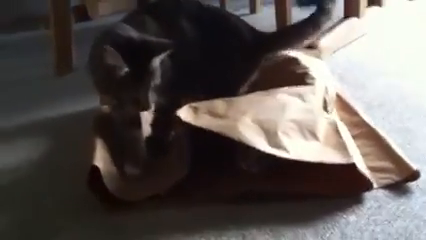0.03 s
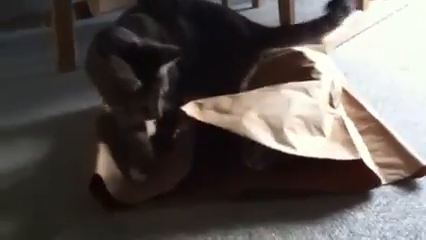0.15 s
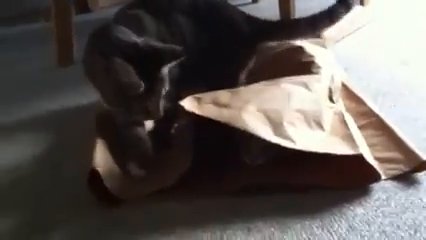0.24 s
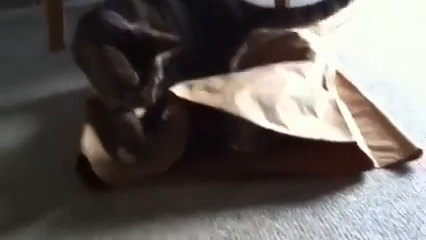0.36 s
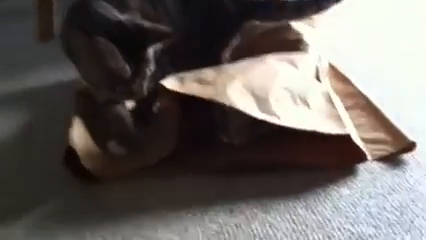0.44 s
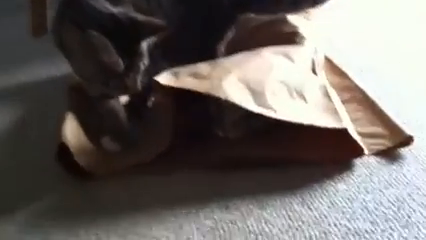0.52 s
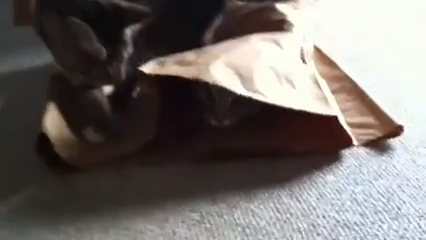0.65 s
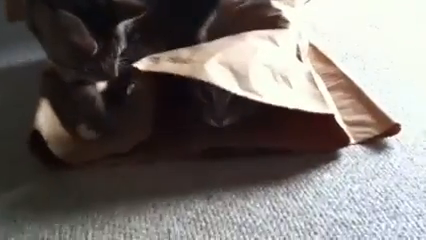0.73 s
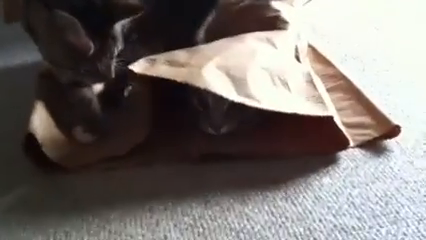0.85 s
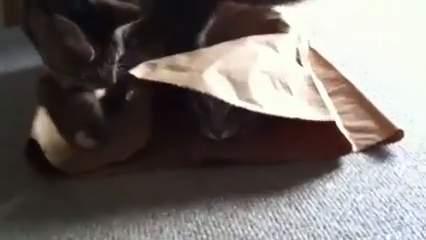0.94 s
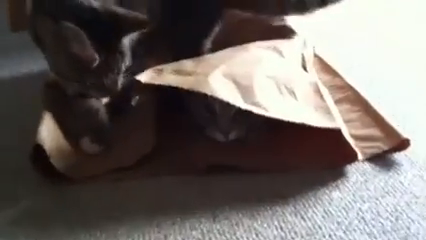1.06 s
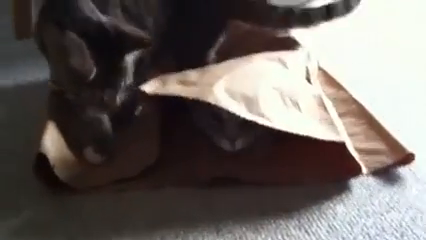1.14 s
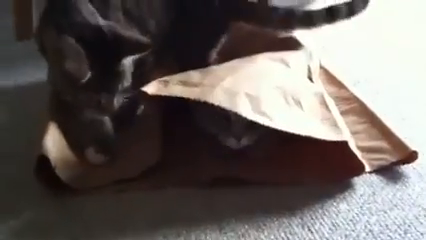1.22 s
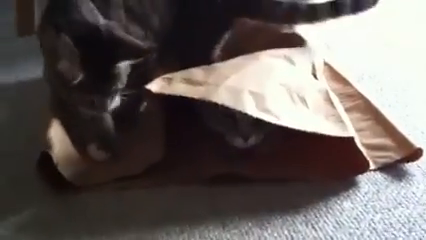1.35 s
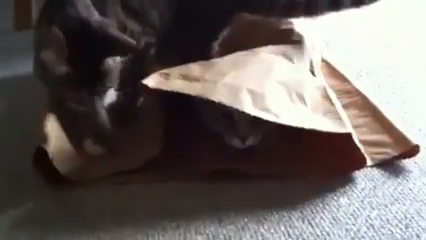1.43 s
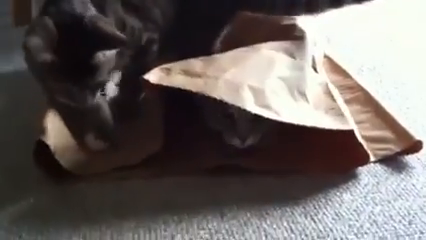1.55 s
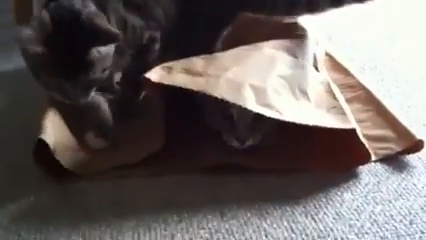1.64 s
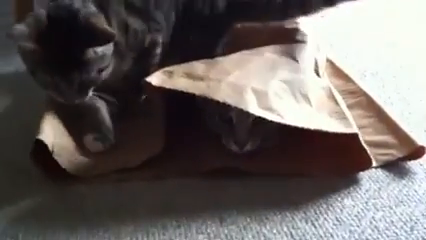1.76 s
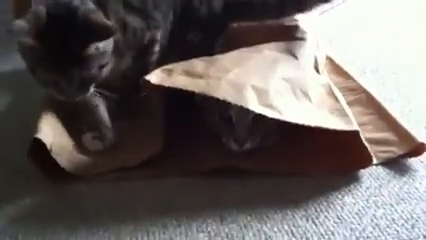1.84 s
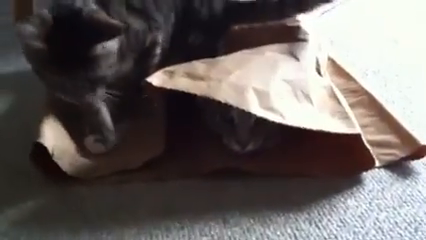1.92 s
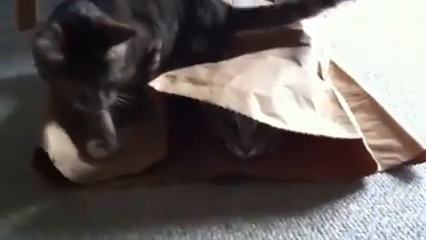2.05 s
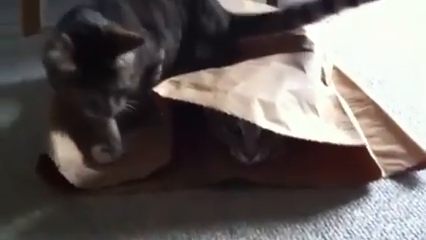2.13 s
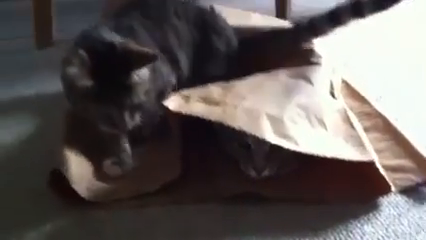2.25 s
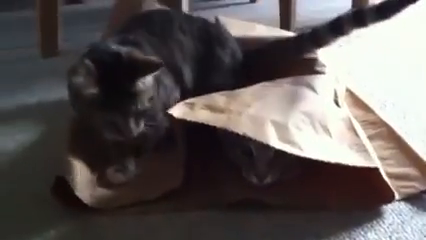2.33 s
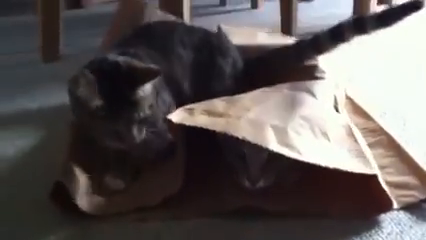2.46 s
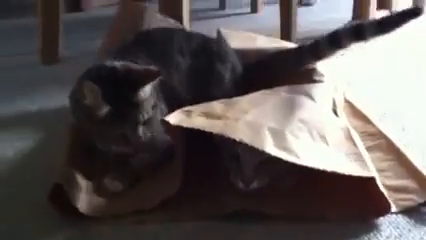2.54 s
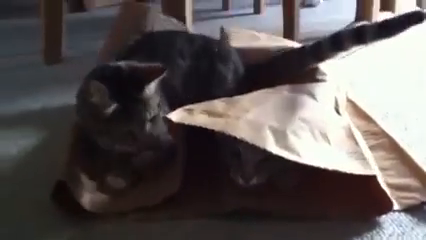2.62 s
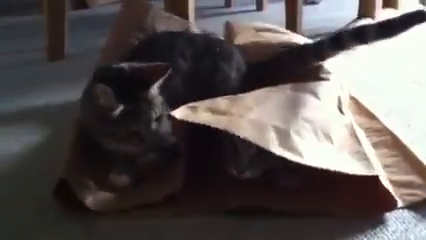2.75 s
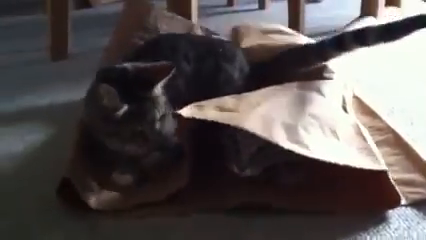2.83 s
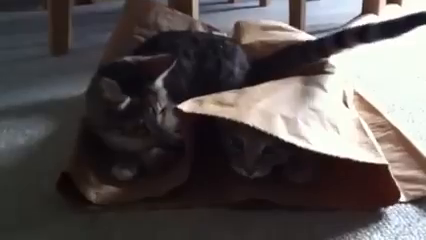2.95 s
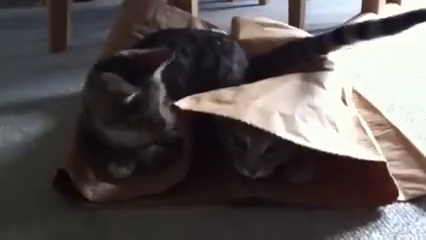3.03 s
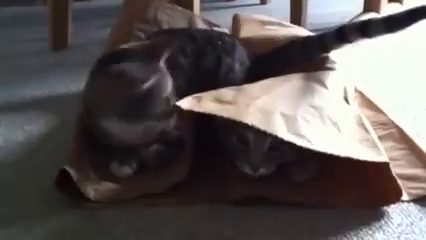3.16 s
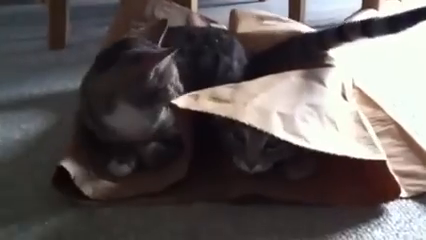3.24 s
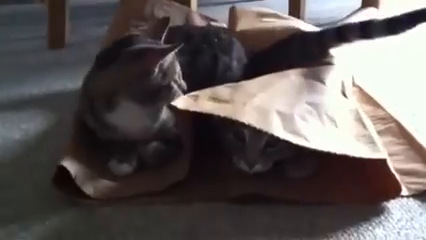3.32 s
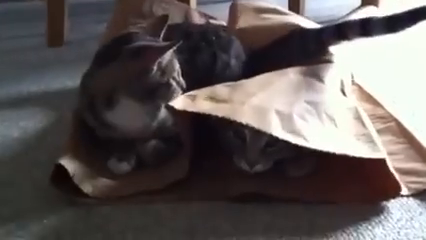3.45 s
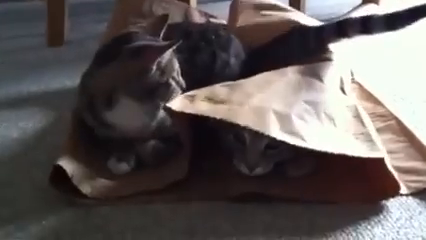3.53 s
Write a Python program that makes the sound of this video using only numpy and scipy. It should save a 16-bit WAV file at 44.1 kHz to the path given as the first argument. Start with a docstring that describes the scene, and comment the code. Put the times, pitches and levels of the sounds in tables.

```python
"""Two cats shift their weight in a large paper bag on a carpet, near a small camera microphone.
A steady room tone and the friction noise of the sliding sheet come first, answered by the furnished room.
Soon presses of a paw crumple the paper, and creases buckle: sharp cracks, each with a flurry of ticks.
Taut panels ping as short resonances, faint deep noise bursts start near loud crackles, close creases pop;
then panels knock as groups of damped modes. The snapping thins out twice before it is densest late on."""
import sys
import numpy as np
from scipy import signal
from scipy.fft import rfft, irfft, next_fast_len
from scipy.io import wavfile
from scipy.ndimage import uniform_filter1d, map_coordinates

SR = 44100
rng = np.random.default_rng(int(sys.argv[2]) if len(sys.argv) > 2 else 0)


def generate_wav(signal):
    """Clip the signal to [-1, 1] and save it as 16-bit WAV at the path in sys.argv[1]."""
    frames = np.transpose(np.atleast_2d(signal))
    scaled = np.clip(frames, -1, 1) * 32767
    pcm = np.round(scaled).astype(np.int16)
    wavfile.write(sys.argv[1], SR, pcm)


def volts_from_decibels(level):
    """Turn decibel levels (scalar or array-like) into linear amplitude factors."""
    exponent = np.asarray(level, float) / 20
    return 10 ** exponent


N = 158760

# Spectrum of the room tone: frequency_hz, relative_level_db
TONE_SPECTRUM = [(15, -55), (25, -22), (60, -40), (90, -8), (150, -1.5), (324, -8), (640, -24),
                 (1100, -22.5), (3860, -18.5), (10000, -20.5), (17000, -13)]
# Friction of the sliding sheet, before trims and waver: time_s, bass_and_middle_level_db, treble_level_db
RUSTLE_LEVELS = [(0.0, -67.5, -73), (0.23, -66, -73), (0.37, -58, -72.5), (0.55, -64, -71),
                 (0.74, -62, -67), (0.95, -56.5, -69), (1.1, -63, -72), (1.46, -71.5, -76),
                 (1.67, -63.5, -71), (1.81, -59.5, -69.5), (1.87, -53.5, -64.5), (2.01, -61, -75),
                 (2.28, -67.5, -79), (2.4, -53, -61.5), (2.55, -55, -62), (2.74, -51, -61),
                 (2.82, -48, -74.5), (3.05, -51, -63.5), (3.26, -63, -63), (3.38, -57, -67),
                 (3.48, -58.5, -67), (3.6, -65.5, -72)]
# Radiation spectrum of the paper: frequency_hz, relative_density_db (per Hz)
PAPER_SPECTRUM = [(25, -48), (90, -40), (130, -16), (170, -7.5), (360, -2.5), (470, -6.5), (720, 0),
                  (1050, -2.5), (1700, -7), (5700, -6), (11000, -10.5), (17000, -13)]
# Resonances of the hollow bag, before BAG_SHARE: centre_hz, width_hz, relative_gain_db
BAG_RESONANCES = [(174, 24, 2.5), (378, 67, 1), (550, 33, 9), (778, 42, -6), (1510, 900, -1)]
# Reverberation time of the room: frequency_hz, t60_s
ROOM_DECAY = [(150, 0.6), (400, 0.35), (2500, 0.38), (8000, 0.33), (15000, 0.13)]
# Level of the reverberation: frequency_hz, level_db
ROOM_COLOUR = [(150, -9.5), (1000, -9.5), (5000, -8.5), (15000, -7)]
# Presses of a paw, levels at the height of the swell:
# start_s, length_s, bass_level_db, middle_level_db, treble_level_db
CRUSHES = [(0.167, 0.055, -67, -61, -59), (0.217, 0.064, -46.5, -46, -43), (1.029, 0.053, -53, -50, -57.5),
           (1.689, 0.076, -51, -52.5, -51.5), (2.25, 0.061, -51, -49, -49.5),
           (2.299, 0.059, -44.5, -49, -43.5), (2.472, 0.066, -50, -47.5, -53), (2.68, 0.052, -49, -44, -45),
           (2.783, 0.1, -48, -46.5, -46), (2.94, 0.059, -63, -51, -43), (3.075, 0.08, -60, -49.5, -56.5),
           (3.171, 0.065, -49, -54.5, -56), (3.255, 0.033, -49.5, -54, -54),
           (3.298, 0.055, -52.5, -53.5, -58.5), (3.489, 0.056, -60.5, -64, -65.5)]
# Buckling creases, before trims; the last three also weight the bands of the crack:
# start_s, crack_peak_db, flurry_bass_level_db, flurry_middle_level_db, flurry_treble_level_db
SNAPS = [(0.182, -27, -39.5, -33, -35), (0.213, -31, -38, -40, -46), (0.228, -31, -29.5, -31, -25),
         (0.242, -9.5, -34, -35, -33), (0.268, -28, -32, -40, -52), (0.294, -33, -35.5, -36, -44),
         (0.367, -38, -60, -54, -60), (0.414, -25.5, -33, -28, -37.5), (0.428, -22, -44, -36.5, -77),
         (0.502, -24.5, -41.5, -39, -41), (0.523, -26.5, -45.5, -41, -53), (0.571, -35, -49.5, -50, -52),
         (0.65, -44, -56, -82, -79), (0.669, -38, -47, -77, -86), (0.728, -38.5, -56, -62, -61.5),
         (0.774, -30, -47.5, -45.5, -43), (0.808, -24.5, -45, -45, -41.5), (0.847, -37, -47, -73, -72),
         (0.886, -36.5, -49, -51, -57), (0.926, -46, -59, -58, -61), (0.999, -38, -38.5, -48, -39),
         (1.023, -24, -47, -39.5, -39.5), (1.049, -52, -40, -46, -42), (1.264, -28, -42, -42.5, -48.5),
         (1.338, -21, -40.5, -35.5, -44), (1.35, -26, -37.5, -41, -57), (1.527, -44, -72, -64, -76),
         (1.633, -25.5, -37, -58, -71), (1.649, -42, -35, -39, -51), (1.669, -25, -43, -38, -39),
         (1.695, -13.5, -37.5, -33.5, -39.5), (1.708, -34, -41, -49, -33), (1.727, -24.5, -51.5, -54, -51),
         (1.823, -25.5, -70, -38.5, -44), (1.847, -55, -57, -64, -69), (1.9, -26, -45, -52, -57),
         (1.928, -47, -59, -47, -44.5), (1.948, -31, -36, -42.5, -71), (1.998, -22.5, -47, -65.5, -73),
         (2.059, -31, -52, -52, -70), (2.089, -31, -44, -58, -79), (2.123, -36.5, -52, -70, -76),
         (2.222, -23.5, -44.5, -38, -40), (2.254, -29, -38, -41, -27), (2.287, -8.5, -49, -30, -27),
         (2.309, -36, -43, -34, -38), (2.325, -18, -38, -38.5, -41.5), (2.339, -19, -35.5, -39.5, -50),
         (2.379, -24.5, -40.5, -44, -54), (2.399, -33, -48, -61, -68), (2.417, -26, -28, -33, -41.5),
         (2.476, -21.5, -28.5, -28.5, -36), (2.488, -27, -58, -45, -32.5), (2.519, -27.5, -39, -62, -64),
         (2.542, -54, -72, -37.5, -42), (2.61, -32, -44, -52, -63), (2.666, -44, -32, -30, -36),
         (2.687, -21, -42, -24, -29), (2.705, -23, -41, -42, -37), (2.787, -18.5, -33, -25, -24.5),
         (2.805, -16, -37, -36.5, -26), (2.887, -14.5, -36, -31, -32.5), (2.904, -30, -52, -31, -28),
         (2.943, -27, -55, -33, -43), (2.99, -62.5, -57, -58, -52), (3.052, -54, -64, -41, -61),
         (3.077, -29, -35.5, -44, -45), (3.114, -39, -39, -27, -31), (3.129, -28, -39, -61, -45),
         (3.17, -19.5, -33, -34.5, -36), (3.207, -27, -66, -35, -44), (3.26, -31, -42, -42.5, -50),
         (3.279, -28, -42.5, -38.5, -46), (3.3, -26, -33.5, -37.5, -34.5), (3.325, -28, -57, -46, -60),
         (3.401, -24.5, -43, -42.5, -40), (3.427, -34, -50, -51, -71), (3.588, -42, -46, -68, -71)]
# Small taut panels, before the trim: start_s, peak_db, centre_hz
PINGS = [(0.185, -33, 1720), (0.2438, -25, 3460), (0.366, -42, 2580), (0.5238, -37, 2110),
         (0.887, -40.5, 1280), (0.9268, -33, 1980), (1.2667, -38, 2600), (1.351, -34, 2220),
         (1.6687, -34, 1520), (1.8231, -39, 1560), (1.9026, -35, 2760), (1.95, -33, 1960),
         (2.0603, -40.5, 2200), (2.6892, -25, 1450), (3.1168, -27.5, 1190), (3.1288, -32, 1210),
         (3.2076, -36, 1510), (3.2787, -39, 3030)]
# Faint deep noise bursts near loud crackles, before the trim and second filtering: start_s, onset_level_db
DEEP_BURSTS = [(0.239, -57), (0.419, -69), (0.809, -72), (1.019, -72), (1.699, -68), (2.289, -63),
               (2.329, -67), (2.479, -67), (2.689, -71), (2.789, -73), (2.889, -67), (2.949, -71),
               (3.069, -72), (3.169, -69), (3.291, -62)]
# Taut creases close to the microphone, before the trim: start_s, peak_db, centre_hz
POPS = [(0.243, -10, 11200), (0.8086, -19, 13300), (1.0231, -24.5, 6560), (1.6955, -24, 12800),
        (2.256, -35, 8600), (2.2883, -18, 13200), (2.8894, -10.5, 11740), (3.1707, -33.5, 7210)]
# A paw or a panel flipping over, before the trim and high-pass: start_s, peak_db, pitch_hz
KNOCKS = [(0.415, -34, 563), (1.338, -55, 554), (1.634, -43, 550), (1.649, -32.5, 743), (1.9, -43, 605),
          (1.951, -38.5, 484), (1.998, -28, 716), (2.089, -40, 910), (2.325, -40, 530), (2.668, -30, 770),
          (2.788, -33.5, 396), (3.17, -38, 510), (3.4, -31.5, 955)]

TONE_DB = -68  # rms
BAG_SHARE = 0.79  # linear gain of the resonances over the paper
BASS_TOP_HZ, TREBLE_BOTTOM_HZ = 1200, 5000
PATCHY_DB = 2  # standard deviation of the shifting colour

# Triples run bass, middle, treble.
TICK_T60_S = (0.012, 0.005, 0.003)
TICKS_PER_S, RUSTLE_TICKS_PER_S = 2500, 900
BIGGEST_TICK = 2.24  # cap on size, in spreads
TICK_COLOUR_DB = 3.5  # scatter of each tick between the bands

RUSTLE_TRIM_DB = (-4.5, -6.5, 1)
RUSTLE_SPREAD_DB = -1  # negative: the skew runs towards small ticks
RUSTLE_SMOOTH, RUSTLE_WAVER_DB = 0.73, 2  # smooth noise over ticks; scale of the level waver

CRUSH_SPREAD_DB, CRUSH_PEAK_AT = 2, 0.31  # share of the length at which it is loudest

FLURRY_T60_S, FLURRY_TRIM_DB = (0.093, 0.078, 0.053), (-6.5, -6, -2.5)
FLURRY_SPREAD_DB, FLURRY_SWELL_S = 2.5, 0.0071
CRACK_T60_S, CRACK_TRIM_DB = (0.01, 0.004, 0.0025), -7
CRACK_KICK = 4  # first jolt over the rattle
CRACK_DELAY_S = 0.002  # the flurry starts just before the crack

PING_T60_S, PING_WIDTH_HZ, PING_DELAY_S, PING_TRIM_DB = 0.0073, 490, 0.0015, -2.5
DEEP_T60_S, DEEP_TOP_HZ, DEEP_TRIM_DB = 0.12, 90.5, 0.5
POP_T60_S, POP_WIDTH_HZ, POP_DELAY_S, POP_TRIM_DB = 0.018, 5600, 0.002, -0.5
POP_ROOM_DB = -6.5  # share of the pops sent to the room

KNOCK_CYCLES = 19  # cycles to die by 60 dB
KNOCK_ATTACK_S, KNOCK_DELAY_S, KNOCK_TRIM_DB = 0.0008, 0.00047, -1
KNOCK_SPREAD, KNOCK_LOW_HZ = 0.13, 223  # relative spacing of the modes; high-pass corner


def unit(x):
    """Normalisation: scale to rms 1 along the last axis."""
    return x / np.sqrt(np.mean(x ** 2, -1, keepdims=True) + 1e-20)


def along(points, hz):
    """Logarithmic interpolation: read (Hz, value) points on a log frequency axis."""
    f, value = np.transpose(points)
    return np.interp(np.log(hz + 1), np.log(f + 1), value)


def filtered(x, response):
    """Linear filtering: multiply the spectrum by a response of frequency."""
    m = next_fast_len(x.shape[-1] + 8192)
    spectrum = rfft(x, m) * response(np.fft.rfftfreq(m, 1 / SR))
    return irfft(spectrum, m)[..., :x.shape[-1]]


def causal(gain):
    """Minimum phase: fold the cepstrum of a gain so that its response starts at once."""
    cepstrum = irfft(np.log(gain + 1e-6))
    half = cepstrum.shape[-1] // 2
    fold = np.r_[1, np.full(half - 1, 2), 1, np.zeros(cepstrum.shape[-1] - half - 1)]
    return np.exp(rfft(cepstrum * fold))


def decay(t, t60_s):
    """Exponential damping: fall by 60 dB in each band's t60."""
    return volts_from_decibels(-60 * t / np.array(t60_s)[:, None])


def paper_bands(hz):
    """Cavity resonance: paper coloured by the bag's hollow, in three bands of unit noise gain."""
    hollow = sum(volts_from_decibels(db) * width / np.hypot(2 * (hz - centre), width)
                 for centre, width, db in BAG_RESONANCES)
    gain = volts_from_decibels(along(PAPER_SPECTRUM, hz)) * (1 + BAG_SHARE * hollow)
    low = 1 / (1 + (hz / BASS_TOP_HZ) ** 4)
    high = 1 - 1 / (1 + (hz / TREBLE_BOTTOM_HZ) ** 4)
    middle = (1 - low) * (1 - high)
    return causal(unit(gain * np.array([low, middle, high])))


def ticks(length, rate, spread_db):
    """Shot noise: creases at random moments, of skewed sizes and colours, as bursts in three bands; rms 1."""
    size_db = spread_db * np.minimum(rng.exponential(1, length), BIGGEST_TICK)
    size_db = size_db + TICK_COLOUR_DB * rng.standard_normal((3, length))
    size = (rng.random(length) < rate / SR) * volts_from_decibels(size_db)
    shape = decay(np.arange(SR // 40) / SR, TICK_T60_S)
    envelope = signal.fftconvolve(size, shape, axes=1)[:, :length]
    return unit(envelope * rng.standard_normal((3, length)))


def room_tone():
    """Stationary noise: steady hum of the home and hiss of the microphone, shaped by a spectrum."""
    noise = rng.standard_normal(N)
    return volts_from_decibels(TONE_DB) * unit(filtered(noise, lambda hz: volts_from_decibels(along(TONE_SPECTRUM, hz))))


def rustle():
    """Friction: the sliding sheet gives ticks over smooth noise, wavering quickly in level."""
    s, level_db, treble_db = np.transpose(RUSTLE_LEVELS)
    t = np.arange(N) / SR
    level_db, treble_db = np.interp(t, s, level_db), np.interp(t, s, treble_db)
    waver = map_coordinates(rng.standard_normal(100), [np.arange(N) * 25 / SR])  # 25 random levels a second
    grain = ticks(N, RUSTLE_TICKS_PER_S, RUSTLE_SPREAD_DB)
    grain = grain + RUSTLE_SMOOTH * rng.standard_normal((3, N))
    band_db = np.array(RUSTLE_TRIM_DB)[:, None] + [level_db, level_db, treble_db]
    return unit(grain) * volts_from_decibels(band_db + RUSTLE_WAVER_DB * waver)


def patchy(x, depth_db):
    """Radiation from many panels: the colour shifts at random from moment to moment."""
    z = signal.stft(x, nperseg=256)[2]
    field = uniform_filter1d(rng.standard_normal(z.shape), size=8, axis=0)  # smooth over frequency
    field = uniform_filter1d(field, size=4, axis=1)  # and over time
    return signal.istft(z * volts_from_decibels(depth_db * field / field.std()), nperseg=256)[1][:N]


def room(x):
    """Reverberation: each frequency dies at its own speed; the tail changes as the sounding spot moves."""
    out, step = np.zeros(N + 2 * SR), SR // 10
    for start in range(0, N, step):
        hz, t, z = signal.stft(rng.standard_normal(SR // 3), SR, nperseg=256)
        fading = volts_from_decibels(-60 * t / along(ROOM_DECAY, hz)[:, None])
        tail = signal.istft(z * fading, SR, nperseg=256)[1]
        wet = signal.fftconvolve(x[start:start + step], tail / np.linalg.norm(tail))
        out[start + 150:][:len(wet)] += wet  # the answer arrives 150 samples later
    return filtered(out[:N], lambda hz: volts_from_decibels(along(ROOM_COLOUR, hz)))


def crushes():
    """Crumpling under load: a paw presses down and dense ticks swell and ebb."""
    level = np.zeros((3, N))
    grain = ticks(N, TICKS_PER_S, CRUSH_SPREAD_DB)
    bend = np.log(0.5) / np.log(CRUSH_PEAK_AT)  # moves the top of the half sine
    for s, length_s, *band_db in CRUSHES:
        progress = np.clip((np.arange(N) / SR - s) / length_s, 0, 1)
        level += volts_from_decibels(np.array(band_db))[:, None] * np.sin(np.pi * progress ** bend)
    return level * grain


def snaps():
    """Buckling: each crease gives one sharp crack coloured like its flurry, and ticks that die away."""
    flurries, cracks = np.zeros((3, N + SR)), np.zeros(N + SR)
    t = np.arange(SR // 5) / SR
    impulse = np.tile(t == 0, (3, 1)) * 1.0
    ring = filtered(impulse, paper_bands)[:, :1024]
    for s, peak_db, *band_db in SNAPS:
        weight = volts_from_decibels(np.array(band_db))[:, None]
        jolt = rng.standard_normal((3, len(t))) + CRACK_KICK * (t == 0)
        rattle = (decay(t, CRACK_T60_S) * jolt)[:, :1024]
        crack = signal.fftconvolve(weight * unit(rattle), ring, axes=1).sum(0)
        crack = volts_from_decibels(peak_db + CRACK_TRIM_DB) * crack / np.abs(crack).max()
        cracks[round((s + CRACK_DELAY_S) * SR):][:len(crack)] += crack

        level = weight * volts_from_decibels(np.array(FLURRY_TRIM_DB))[:, None]
        level = level * decay(t, FLURRY_T60_S) * (1 - np.exp(-t / FLURRY_SWELL_S))
        flurry = level * ticks(len(t), TICKS_PER_S, FLURRY_SPREAD_DB)
        flurries[:, round(s * SR):][:, :len(t)] += flurry
    return cracks[:N] + filtered(flurries[:, :N], paper_bands).sum(0)


def bursts(rows, t60_s, width_hz, delay_s, trim_db):
    """Forced resonance: for each row a dying rattle drives one resonance."""
    out, t = np.zeros(N + SR), np.arange(1024) / SR
    for s, peak_db, hz in rows:
        rattle = volts_from_decibels(-60 * t / t60_s) * rng.standard_normal(len(t)) * rng.exponential(1, len(t))
        burst = filtered(rattle, lambda f: 1j * f * width_hz / (hz * hz - f * f + 1j * f * width_hz))
        burst = volts_from_decibels(peak_db + trim_db) * burst / np.abs(burst).max()
        out[round((s + delay_s) * SR):][:len(t)] += burst
    return out[:N]


def pings():
    """Narrow resonance: small taut panels tick on a middle pitch."""
    return bursts(PINGS, PING_T60_S, PING_WIDTH_HZ, PING_DELAY_S, PING_TRIM_DB)


def deep_bursts():
    """Exponential decay: low-passed noise bursts below about 90 Hz, starting near loud crackles."""
    t = np.arange(N) / SR
    level = sum(volts_from_decibels(db + DEEP_TRIM_DB - 60 * np.abs(t - s) / DEEP_T60_S) * (t > s) for s, db in DEEP_BURSTS)
    deep = lambda hz: 1 / (1 + (hz / DEEP_TOP_HZ) ** 6) * (hz > 20)
    noise = unit(filtered(rng.standard_normal(N), deep))
    return filtered(level * noise, deep)  # again, to soften the onsets


def pops():
    """Wide resonance: taut creases close by pop brightly in the treble."""
    return bursts(POPS, POP_T60_S, POP_WIDTH_HZ, POP_DELAY_S, POP_TRIM_DB)


def knocks():
    """Modal vibration: three close panel modes ring for a few cycles, high-passed."""
    out, t = np.zeros(N + SR), np.arange(SR // 10) / SR
    spacing = 1 + KNOCK_SPREAD * np.array([[-1], [0], [1]])
    for s, peak_db, hz in KNOCKS:
        modes_hz = hz * spacing * volts_from_decibels(rng.normal(0, 0.3, (3, 1)))  # slightly detuned at random
        ring = np.sin(2 * np.pi * modes_hz * t).sum(0)
        ring = ring * volts_from_decibels(-60 * t * hz / KNOCK_CYCLES) * (1 - np.exp(-t / KNOCK_ATTACK_S))
        ring = volts_from_decibels(peak_db + KNOCK_TRIM_DB) * ring / np.abs(ring).max()
        out[round((s + KNOCK_DELAY_S) * SR):][:len(t)] += ring
    return filtered(out[:N], lambda f: causal(1 / (1 + (KNOCK_LOW_HZ / (f + 1)) ** 4)))


def scene():
    """Superposition: the bag in its room; the pops are close and aimed, so the room hears less of them."""
    buckling = snaps()
    friction = filtered(rustle() + crushes(), paper_bands).sum(0)
    paper = patchy(buckling + friction, PATCHY_DB)
    bag = paper + knocks() + pings()
    close = pops()
    wet = room(bag + volts_from_decibels(POP_ROOM_DB) * close)
    return (bag + close + wet + deep_bursts() + room_tone())[None]


def roll_off(x):
    """The treble ends steeply here."""
    return signal.sosfilt(signal.butter(12, 16980, fs=SR, output="sos"), x)


def record(dry):
    """Band limitation: the camera passes what lies below 15850 Hz and lowers the rest by 44 dB."""
    mix = filtered(dry, lambda hz: np.where(hz < 15850, 1, volts_from_decibels(-44)))
    return roll_off(mix)


dry = scene()
out = record(dry)
generate_wav(out)
```